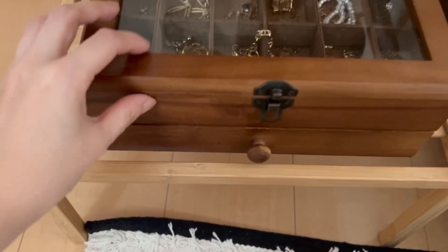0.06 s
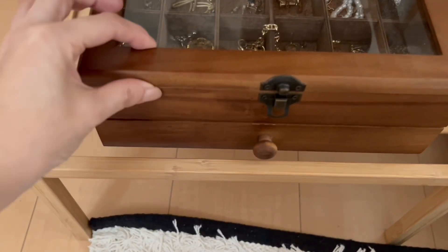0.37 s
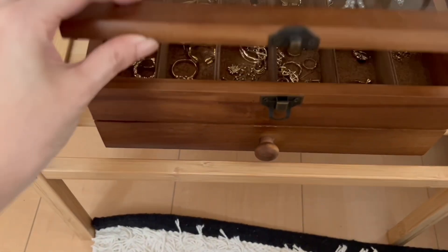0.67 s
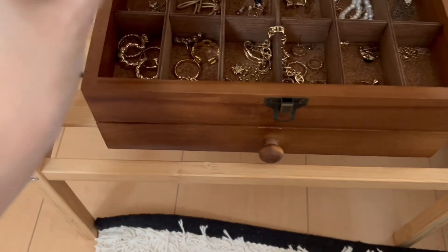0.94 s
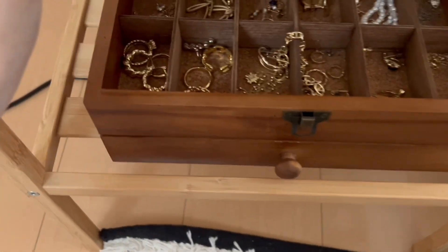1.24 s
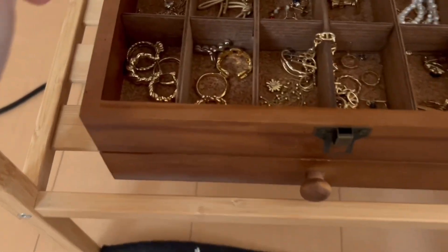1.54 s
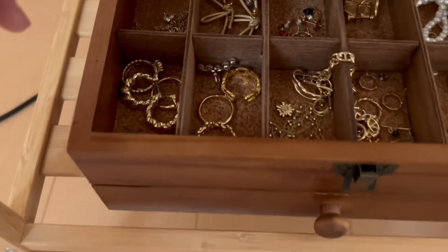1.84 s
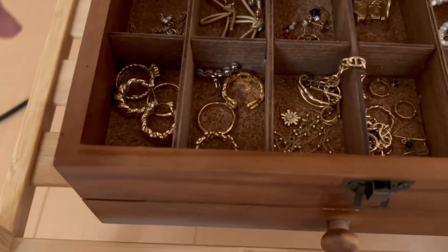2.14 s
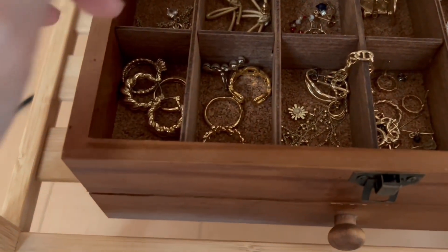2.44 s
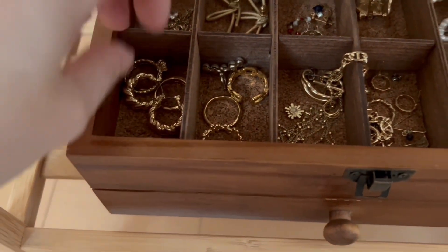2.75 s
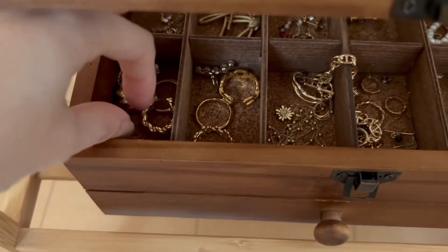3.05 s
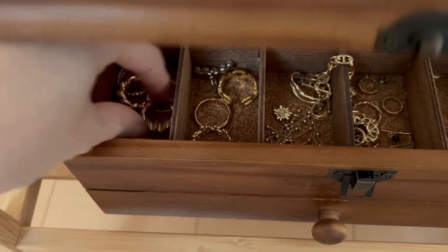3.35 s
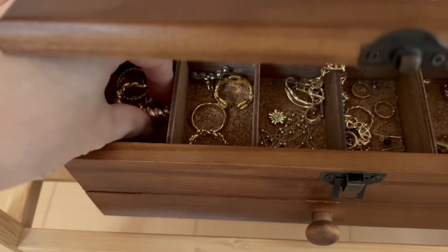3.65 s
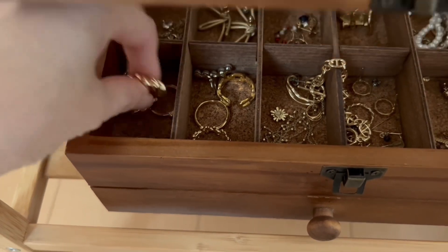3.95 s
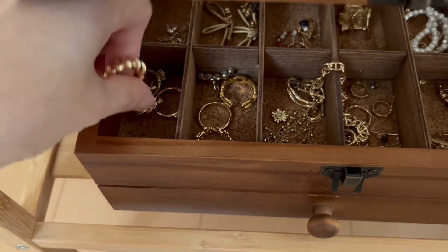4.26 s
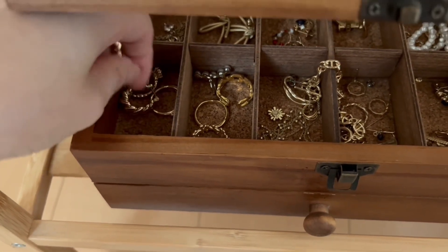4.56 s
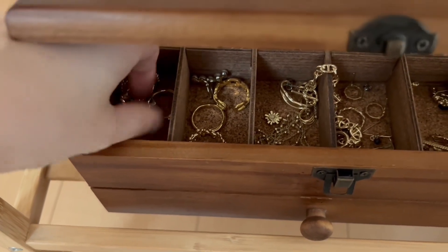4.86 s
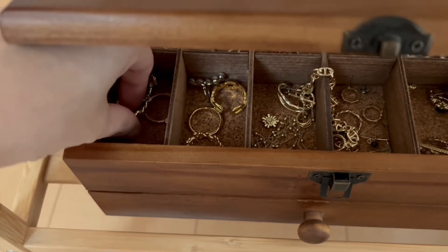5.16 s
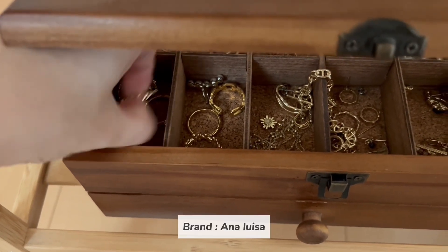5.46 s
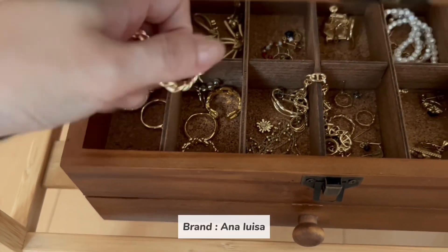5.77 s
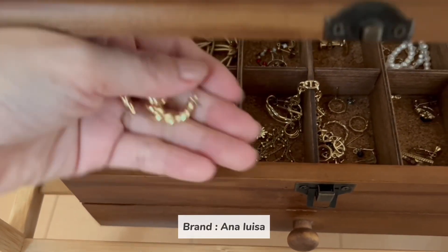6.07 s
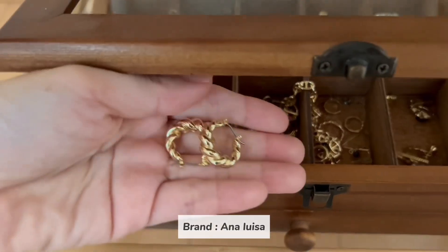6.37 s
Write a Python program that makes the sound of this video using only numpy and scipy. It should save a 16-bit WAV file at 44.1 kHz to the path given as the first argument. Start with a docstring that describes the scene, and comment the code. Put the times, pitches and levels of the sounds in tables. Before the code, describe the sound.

Small metal hoops clack and clink in a wooden jewellery box as fingers lift the lid and pick through, over a low room hum.

```python
"""A low hum and a rustle of clothing, then a hand lifts the lid of a wooden jewellery box: the latch
clicks, the hollow case knocks and the shelf thumps beneath it. Fingers rub the wood and pick out two
gold hoops, which slide and clack on the thin dividers and tray, then ring against each other in the palm.
Struck wood and metal are decaying modes; friction is uneven noise that swells with each move.
A phone's two microphone ports hear it from close by in a small, quiet room."""
import sys
import numpy as np
from scipy import signal
from scipy.fft import rfft, irfft, next_fast_len
from scipy.io import wavfile

SR = 44100
rng = np.random.default_rng(int(sys.argv[2]) if len(sys.argv) > 2 else 0)


def put_to_file(sound):
    """Save the sound as 16-bit audio at rate SR, in the file named by the first command-line argument."""
    columns = np.atleast_2d(sound).T  # one column per channel
    safe = np.clip(columns, -1, 1)
    whole_steps = np.round(safe * 32767)
    wavfile.write(sys.argv[1], SR, whole_steps.astype(np.int16))


N = 282681
TIME = np.arange(N) / SR
RING_TIME = np.arange(SR // 3) / SR  # seconds since a strike

# Tone colours of a gritty scrape, a hoop's hard crack and the bright tick of metal.
# Each row: frequency in Hz, level in dB.
GRIT_SPECTRUM = [(700, 18.5), (1900, 15.5), (2700, 2.5), (3600, 11), (4400, 4.5), (5100, 6.5), (6500, -4),
                 (8000, -5.5), (10500, -13.5), (15500, -9)]
HOOP_CRACK_SPECTRUM = [(1500, -14), (2700, -3.5), (3500, 6.5), (4600, 4), (5800, 11), (8000, -3.5),
                       (10000, -6), (12000, -18)]
TICK_SPECTRUM = [(8000, -20), (10500, -2.5), (13000, -1), (14600, -3), (15600, 0.5), (16000, -21)]
# Modes of the first hoop. Each row: frequency in Hz, level in dB, seconds to fade by 60 dB.
FIRST_HOOP_MODES = [(9565, 10.5, 0.028), (9650, 2, 0.021), (5070, -21, 0.06)]


def undb(db):
    """Decibels to gain."""
    return 10 ** (np.asarray(db) / 20)


def unit(x):
    """Scale to rms 1."""
    return x / np.sqrt(np.mean(x ** 2))


def at_level(x, db):
    """Set the rms level of a strike's first 20 ms."""
    return x * undb(db) / np.sqrt(np.mean(x[:SR // 50] ** 2))


def add(out, s, x):
    """Mix a sound in at s seconds."""
    start = max(int(s * SR), 0)
    out[:, start:start + x.shape[-1]] += x[..., :N - start]


def pan(db):
    """Stereo gains for a left-minus-right level."""
    return undb(np.array([[db], [-db]]) / 2)


def colour(x, spectrum):
    """Equalise through (Hz, dB) points on a log-frequency axis, rolling off below the first."""
    hz, db = np.transpose(spectrum)
    size = next_fast_len(x.shape[-1] + SR // 10)
    f = np.maximum(np.fft.rfftfreq(size, 1 / SR), 1)
    gain = undb(np.interp(np.log(f), np.log(hz), db)) / (1 + (hz[0] / 2 / f) ** 2)
    return irfft(rfft(x, size) * gain, size)[..., :x.shape[-1]]


def wander(rate):
    """A random curve with a spread near 1 that turns `rate` times a second."""
    knots = np.arange(0, TIME[-1] + 1, 1 / rate)
    return np.interp(TIME, knots, rng.standard_normal(len(knots)))


def strokes(moves):
    """Envelope of a series of hand moves: each swells to its fastest moment and dies away."""
    power = 0
    for s, db, rise_s, fall_s in moves:
        away = np.abs(TIME - s) / np.where(TIME < s, rise_s, fall_s)
        bell = np.exp(-np.minimum(away, 10) ** 2.2)
        power = power + (undb(db) * bell) ** 2
    return np.sqrt(power)


def ring(modes, detune, contact_s, sustain=1, pitch=1):
    """Struck modes: the spot that is hit varies strength and pitch, the contact time rounds the attack."""
    hz, db, t60 = np.transpose(modes)[:, :, None]
    strength, shift = rng.standard_normal((2, len(modes), 1))
    phase = 2 * np.pi * hz * pitch * (1 + detune * shift) * RING_TIME
    fade = undb(db + 2 * strength) * np.exp(-np.log(1000) * RING_TIME / (t60 * sustain))
    sign = (-1) ** np.arange(len(modes))[:, None]  # neighbouring modes swing in opposite directions
    attack = 1 - np.exp(-RING_TIME / contact_s)
    return np.sum(sign * fade * np.sin(phase), axis=0) * attack


def chatter(spectrum, rise_s, decay_s):
    """A metal edge skips over a surface in a few milliseconds of tiny impacts."""
    count = len(RING_TIME)
    impact_sizes = undb(3 * np.repeat(rng.standard_normal(count), 32)[:count])
    envelope = (1 - np.exp(-RING_TIME / rise_s)) * np.exp(-RING_TIME / decay_s)
    return colour(rng.standard_normal(count) * impact_sizes * envelope, spectrum)


def scatter(x):
    """Lid and hand scatter the upper mids, so each port hears them with a different phase."""
    centre_hz, width_octaves, spread_radians, step_hz = 3200, 0.54, 1.8, 442
    size = next_fast_len(len(x) + SR // 10)
    f = np.maximum(np.fft.rfftfreq(size, 1 / SR), 1)
    knots = np.linspace(0, 64 * step_hz, 64)
    band = np.exp(-(np.log2(f / centre_hz) / width_octaves) ** 2)
    turn = spread_radians * np.interp(f, knots, rng.standard_normal(len(knots))) * band
    return irfft(rfft(x, size) * np.exp(1j * np.array([turn, -turn]) / 2), size)[:, :len(x)]


def hum():
    """Low ventilation rumble, alike at both ports in the bass, with three wavering tones."""
    # The rumble's colour, then the tones. Each row: frequency in Hz, level in dB.
    rumble_spectrum = [(25, -20.5), (50, -3.5), (75, -1), (130, -6.5), (250, -11), (430, -13.5), (500, -25),
                       (900, -27.5), (1700, -34.5), (2500, -46), (5000, -44), (8000, -70.5), (16000, -54.5)]
    hum_tones = [(73, -64), (101, -64), (296, -70.5)]
    common = colour(rng.standard_normal(N), [(30, 4.5), (400, -2.5), (700, -10.5), (5000, -17.5)])
    apart = colour(rng.standard_normal((2, N)), [(30, -4.0), (400, -3), (700, 2.0), (5000, -3.5)])
    rumble = unit(colour(common + apart, rumble_spectrum)) * undb(-57 + 3.3 * wander(rate=9.8))
    tones = 0
    for hz, db in hum_tones:
        amplitude = np.sqrt(2) * undb(db + 4.1 * wander(rate=6.1))
        tones = tones + amplitude * np.sin(2 * np.pi * hz * TIME + 1.57 * wander(rate=8.9))
    fade_in = undb(-4 * np.maximum(1 - TIME / 0.94, 0))  # comes up 4 dB, then holds
    return (rumble + tones) * fade_in * pan(db=1.6)


def clothing():
    """Fibres swish with each move of the arm and whisper faintly in between."""
    # Each row: peak time in seconds, level in dB, rise and fall in seconds.
    swishes = [(0.03, -86, 0.023, 0.063), (.66, -86, 0.014, .02), (0.838, -75, 0.012, 0.11),
               (1.13, -72.5, 0.083, 0.074), (1.33, -85, 0.087, .15), (1.535, -74.5, 0.032, 0.14),
               (2.345, -72.5, 0.017, 0.17), (2.53, -65, 0.18, 0.15), (2.75, -68.5, 0.042, 0.022),
               (3.11, -79, 0.025, 0.066), (3.35, -67, 0.045, 0.092), (4.395, -75.5, 0.011, 0.012),
               (4.76, -76.5, 0.11, 0.039), (4.93, -74.5, 0.073, 0.046), (5.46, -64.5, 0.025, 0.031),
               (5.6, -85, 0.061, 0.052), (5.87, -69, 0.062, 0.21), (6.31, -79.5, 0.012, 0.0079)]
    # The cloth's airy colour. Each row: frequency in Hz, level in dB.
    cloth_spectrum = [(300, -10.5), (900, -0.5), (2000, -8), (3500, -8), (5500, 2), (8000, 3), (9300, 1.5),
                      (10500, -1), (12500, 2.5), (15500, -5.5)]
    fibres = rng.standard_normal(N) * undb(3.3 * rng.standard_normal(N) + 1.1 * wander(rate=620))
    movement = np.hypot(strokes(swishes), undb(-90.5))
    flutter = undb(1.1 * wander(rate=120))
    return unit(colour(fibres, cloth_spectrum)) * movement * flutter


def gritty_scrapes():
    """Short gritty scrapes: first the hand and lid on the box, later a hoop sliding on wood and skin."""
    # Each row: start in seconds, length in seconds, level in dB.
    scrapes = [(0.349, 0.09, -76), (1.06, 0.11, -71), (3.297, 0.059, -66), (3.362, 0.081, -53),
               (3.45, 0.12, -69.5), (3.91, 0.06, -70), (4.136, 0.13, -70), (4.725, 0.12, -72),
               (4.878, 0.11, -77), (5.116, 0.059, -64), (5.237, 0.069, -70), (5.426, 0.041, -65.5),
               (5.832, 0.098, -70.5)]
    # The hoops rub together as they roll into the palm, and their lowest mode sings.
    # Each row: peak time in seconds, level in dB, rise and fall in seconds.
    rolls = [(5.9, -73, .055, 0.11)]
    pressure = sum(undb(db) * np.sin(np.pi * np.clip((TIME - s) / length, 0, 1))
                   for s, length, db in scrapes)
    grit = rng.standard_normal(N) * undb(1.2 * wander(rate=1500) + 6 * wander(rate=40))
    lowest_mode_hz = FIRST_HOOP_MODES[2][0]
    singing = signal.lfilter(*signal.iirpeak(lowest_mode_hz, Q=35, fs=SR), grit)
    return scatter(unit(colour(grit, GRIT_SPECTRUM)) * pressure + unit(singing) * strokes(rolls))


def finger_rubs():
    """Fingertips catch and slip on the wood with a dull, wide rub."""
    # Each row: peak time in seconds, level in dB, rise and fall in seconds.
    rubs = [(.39, -72, 0.034, 0.081), (1.13, -60.5, 0.13, 0.11), (1.55, -68.5, 0.3, 0.2),
            (2.39, -68, 0.11, 0.1), (2.62, -66, 0.17, 0.042), (2.81, -56.5, 0.057, 0.07),
            (3.41, -51.5, 0.093, 0.15), (3.94, -49.5, 0.036, 0.075), (4.17, -64.5, 0.014, 0.034),
            (4.74, -56, 0.084, 0.041), (4.96, -49.5, 0.066, 0.057), (5.21, -62.5, 0.047, 0.13),
            (5.45, -61, 0.015, 0.053)]
    # The rub's dark colour. Each row: frequency in Hz, level in dB.
    rub_spectrum = [(200, 8), (450, 14.5), (800, 10.5), (1200, 4), (2000, -6), (3000, -6.5), (5000, -14.5),
                    (9000, -56.5)]
    friction = rng.standard_normal(N) + 2.0 * rng.standard_normal((2, N))
    slips = friction * undb(7.2 * wander(rate=240))
    return unit(colour(slips, rub_spectrum)) * strokes(rubs)


def rattle(strike):
    """Loose metal bounces on in quick, uneven, fading touches that share about the strike's energy."""
    bounces_per_s, rise_s, decay_s = 350, 0.0044, 0.018
    bounces = rng.random(len(RING_TIME)) < bounces_per_s / SR
    envelope = (1 - np.exp(-RING_TIME / rise_s)) * np.exp(-RING_TIME / decay_s)
    touches = bounces * rng.standard_normal(len(RING_TIME)) * envelope
    return signal.fftconvolve(touches / np.linalg.norm(touches), strike)[:len(RING_TIME)]


def metal_on_wood(contacts, crack_spectrum, tick_db):
    """Metal cracks on wood: the struck spot and dividers ring, the tray follows, the metal rattles on."""
    # Modes of the heavy tray and thin dividers.
    # Each row: frequency in Hz, level in dB, seconds to fade by 60 dB.
    tray_modes = [(178.7, -19.5, 0.081), (257, -18, 0.095), (438, -1.5, 0.037), (515, -4, 0.018),
                  (625.5, 1, 0.044), (713, -1, 0.017)]
    divider_modes = [(980, 1, 0.02), (1203, 8, 0.028), (1585, -2.5, 0.044), (1828, 6, 0.017),
                     (2165, 2.5, 0.0083), (2365, -4, 0.025), (2580, 1.5, 0.01), (3030, -7, 0.0096),
                     (3450, -1, 0.012)]
    # Close modes of a struck spot. Each row: multiple of its note, level in dB, seconds to fade by 60 dB.
    spot_cluster = [(1, 2.5, 0.014), (0.88, -1, 0.013), (1.12, -3, 0.011)]
    # A dry thwack across the grain and one scraping touch. Each row: frequency in Hz, level in dB.
    thwack_spectrum = [(300, -8), (500, -2), (700, 2), (900, -3.5), (1200, 2), (1500, 5.5), (2100, 0.5),
                       (2900, -10), (5000, -21), (9000, -36)]
    scrape_spectrum = [(600, 2), (1200, 12), (2300, 0.5), (2900, -1), (3600, -2.5), (4300, -13.5),
                       (5400, -9), (6500, -22.5), (12000, -27.5)]
    # Where the hand works. Each row: time in seconds, left minus right in dB.
    hand_path = [(1.1, 3.5), (2.57, 0), (3.38, -4), (3.95, -2.5), (4.7, 11), (4.95, 1.5), (5.12, -0.5),
                 (5.4, -1)]
    out = np.zeros((2, N))
    for s, db, crack_db, tray_db, spot_hz, spot_db, rattle_db in contacts:
        place = pan(np.interp(s, *np.transpose(hand_path)))
        spot_modes = [(spot_hz * ratio, mode_db, t60) for ratio, mode_db, t60 in spot_cluster]
        graze = at_level(chatter(GRIT_SPECTRUM, rise_s=0.0014, decay_s=0.0025), db - 15)
        tray = at_level(ring(tray_modes, detune=0.033, contact_s=0.0018, sustain=0.94), db + tray_db)
        dividers = at_level(ring(divider_modes, detune=0.026, contact_s=0.0016), db - 2)
        thwack = at_level(chatter(thwack_spectrum, rise_s=0.0026, decay_s=0.0059), db - 8.5)
        spot = at_level(ring(spot_modes, detune=0.011, contact_s=0.0004), db + spot_db)
        crack = at_level(chatter(crack_spectrum, rise_s=0.0022, decay_s=0.0034), db + crack_db)
        tick = at_level(chatter(TICK_SPECTRUM, rise_s=0.003, decay_s=0.0019), db + crack_db + tick_db)
        scrape = at_level(chatter(scrape_spectrum, rise_s=0.00047, decay_s=0.0012), db - 6.5)
        add(out, s - 0.004, scatter(graze) * place)  # metal never lands flat: one edge touches first
        add(out, s + 0.00099, tray * place)
        bounces = undb(rattle_db) * rattle(spot + scrape)
        add(out, s, scatter(dividers + thwack + spot + bounces) * place + scatter(crack + tick))
    return out


def lid_clicks():
    """Latch and hinge click against the wood as the lid moves."""
    # Each row: start in seconds, level in dB, crack and tray in relative dB,
    # the struck spot's note in Hz, spot and rattle in relative dB.
    clicks = [(0.471, -64.5, 5.5, -5, 2020, -9, 9.5), (0.478, -59, 1, -10, 1920, -19, 0.5),
              (1.084, -72, 14, -10, 1820, 3, -4), (1.093, -55.5, 11.5, 2, 1580, 2.5, -4.5),
              (1.097, -59, 4, 3, 1750, -14, 5), (2.565, -63.5, 0, 16, 1700, -2.5, -4),
              (2.779, -56, 7.5, 11, 900, 1.5, -2), (2.848, -61.5, -8, 7, 1920, 3.5, -14)]
    # The crack of the lid's fittings. Each row: frequency in Hz, level in dB.
    fitting_spectrum = [(1500, -29), (2800, 9), (3300, 1), (4000, -4.5), (5400, 7), (6500, 3.5), (8500, 0),
                        (10000, -8.5), (12000, -28)]
    return metal_on_wood(clicks, fitting_spectrum, tick_db=-13)


def case_knocks():
    """Lid and hand knock the hollow case; the shelf under it answers with a slow, low thump."""
    # Each row: start in seconds, level in dB, contact time in seconds, share of full ring, pitch factor.
    knocks = [(0.481, -40, 0.0012, 0.55, 1.03), (1.111, -41.5, 0.0043, 0.3, 0.95),
              (2.567, -36, 0.00043, 1, 0.98), (2.784, -44.5, 0.00087, 1, 0.94),
              (3.043, -56, 0.0016, 0.59, 1.02), (3.395, -40, 0.00064, 0.5, 1.01),
              (4.493, -52, .002, 0.81, 1.03), (4.578, -56, 0.0016, 1, 1), (4.682, -43, .001, 0.56, 0.9),
              (4.695, -37, 0.00061, 1, 1.01), (4.903, -43.5, .0007, .8, 1.01)]
    # Soft bumps of the hand that shake only the shelf. Each row: start in seconds, level in dB.
    bumps = [(2.809, -44.5), (3.316, -49.5), (5.515, -47.5)]
    # Modes of case and shelf. Each row: frequency in Hz, level in dB, seconds to fade by 60 dB.
    case_modes = [(334.5, 1, 0.079), (407.6, 2.5, 0.095), (447, -14.5, 0.13), (630, -7.5, 0.076),
                  (725, -17, 0.052), (937, -11, 0.076), (1550, -19.5, 0.046)]
    shelf_modes = [(78.5, -4, 0.34), (115.8, -1, 0.14), (172.6, 3, 0.065)]
    firm_knock_db, firm_thump_db, thump_db_per_db, thump_delay_s = -40.5, -49.5, 0.59, 0.0236
    out = np.zeros((2, N))
    for s, db, contact_s, sustain, pitch in knocks:
        knock = ring(case_modes, detune=0.014, contact_s=contact_s, sustain=sustain, pitch=pitch)
        add(out, s, at_level(knock, db))
    thumps = [(s + thump_delay_s, firm_thump_db + thump_db_per_db * (db - firm_knock_db))
              for s, db, *_ in knocks]
    for s, db in thumps + bumps:
        add(out, s, at_level(ring(shelf_modes, detune=0.066, contact_s=0.031), db))
    return out * pan(db=1.5)


def skin_rasps():
    """Dry skin and sleeve catch suddenly and drag on in fine, uneven grains."""
    # Each row: peak time in seconds, level in dB, rise and fall in seconds.
    rasps = [(0.832, -74, 0.0071, 0.18), (1.11, -65, 0.074, 0.088), (1.53, -74.5, 0.013, 0.29),
             (2.36, -89, 0.04, 0.18), (2.58, -71, 0.13, 0.083), (2.8, -74, 0.034, 0.057),
             (3.525, -70, 0.012, 0.023), (4.165, -76, 0.0085, 0.036), (4.235, -79.5, 0.01, 0.023),
             (4.71, -73.5, 0.036, 0.087), (4.945, -72, 0.0065, 0.012), (5.145, -60, 0.011, 0.021),
             (5.26, -81, 0.02, 0.052), (5.94, -62, 0.035, 0.04)]
    # The rasp's dry colour. Each row: frequency in Hz, level in dB.
    rasp_spectrum = [(800, -3.5), (2000, -7), (2800, -6), (3600, 1.5), (4300, -5.5), (5300, 6),
                     (6200, -4.5), (12000, -11)]
    grains = rng.standard_normal(N) * undb(1.6 * wander(rate=2000) + 3.1 * wander(rate=57))
    return scatter(unit(colour(grains, rasp_spectrum)) * strokes(rasps))


def box_creaks():
    """Hinge and dry joints stick and slip under the hand, sounding a few narrow resonances."""
    # Each row: start in seconds, length in seconds, pitch in Hz, level in dB.
    creaks = [(1.021, 0.18, 1644, -61), (2.326, 0.15, 896, -63)]
    # Each row: multiple of the creak's pitch, level in dB.
    resonances = [(0.68, -3), (1, -3), (2.1, -14)]
    out = np.zeros((2, N))
    for s, length, hz, db in creaks:
        slips = rng.standard_normal(N) * undb(3.3 * wander(rate=126))
        tone = sum(undb(part_db) * signal.lfilter(*signal.iirpeak(hz * ratio, Q=20, fs=SR), slips[:SR])
                   for ratio, part_db in resonances)
        swell = np.sin(np.pi * np.clip(TIME[:SR] / length, 0, 1))
        add(out, s, unit(tone) * undb(db) * swell)
    return out


def finger_drags():
    """A fingertip sticks and slips over the grain of the case, each catch a tiny click."""
    # Each row: peak time in seconds, level in dB, rise and fall in seconds.
    drags = [(2.4, -72, 0.049, 0.11), (2.6, -65.5, 0.091, 0.058), (2.76, -64, 0.018, 0.038),
             (5.46, -66, .025, 0.037)]
    # The colour of one catch. Each row: frequency in Hz, level in dB.
    catch_spectrum = [(500, 12.5), (900, 6), (1400, -2), (2000, 1), (2500, -8), (3500, -12), (4700, -7),
                      (5400, -5), (7000, -14), (12000, -21)]
    catches_per_s = 650
    caught = rng.random(N) < catches_per_s / SR
    sizes = undb(2.5 * rng.standard_normal(N) + 4.8 * wander(rate=46))
    catches = caught * sizes * rng.choice([-1, 1], N)
    return scatter(unit(colour(catches, catch_spectrum)) * strokes(drags))


def hoop_clacks():
    """The gold hoops strike their compartment, with a brighter tick than the lid's fittings."""
    # Each row: start in seconds, level in dB, crack and tray in relative dB,
    # the struck spot's note in Hz, spot and rattle in relative dB.
    clacks = [(2.961, -73.5, -25, 11.5, 1430, -3, -3), (3.373, -38.5, -5.5, 1.5, 2290, -8, -6),
              (3.385, -48, -10, 7.5, 2400, -2.5, -5), (3.3975, -50, -12, 7, 1140, -16, -19),
              (3.408, -47, -7.5, -7, 2120, -1, -16), (3.459, -47.5, -5.5, 0.5, 2140, -5.5, -5),
              (3.514, -51.5, -5, -2.5, 2218, -3, -14), (3.716, -52, -10, -4, 2260, -11.5, 3),
              (3.749, -59.5, -15, 6.5, 2280, 0, -13), (3.91, -35, -10, 5, 2470, -0.5, -16.5),
              (3.925, -53, -17, 9, 1900, -6, -6), (3.946, -56, -24, 3, 2070, -1, -8),
              (3.959, -47.5, -10.5, 1.5, 2330, -3.5, -8.5), (4.421, -79, -15.5, -3, 1780, -2, -16),
              (4.692, -64, -2, 17.5, 1850, -3, -2), (4.924, -46, -29, 5.5, 960, -4, -15),
              (4.9445, -44, -41, 3, 1767, -0.5, -10.5), (4.954, -58, -28, 7, 1040, 9.5, -11),
              (4.977, -61, -9.5, 4, 2220, -2, -4), (5.101, -69, -31, 4, 2220, 2, -15),
              (5.13, -63.5, -3, 7.5, 1240, -1, 10), (5.139, -54, -10, -1, 3530, -8.5, -1),
              (5.164, -56.5, -10, -4, 2280, -6, -17), (5.207, -50, -5.5, 7.5, 1650, -12, -8),
              (5.232, -48, -8, 2, 1570, -20, -13), (5.317, -50.5, -6, -0.5, 1960, 0, -9),
              (5.381, -49, -12.5, -1, 2100, -7.5, -19)]
    return metal_on_wood(clacks, HOOP_CRACK_SPECTRUM, tick_db=-8.5)


def hoop_clinks():
    """Two hoops meet with a sharp tick and ring for as long as the fingers that hold them allow."""
    # Each row: start in seconds, levels of first hoop, second hoop and tick in dB, share of full ring.
    clinks = [(3.459, -61, -82, -58, 0.68), (3.729, -72.5, -82, -65, 0.34), (5.875, -46, -63.5, -59, 1),
              (5.8835, -51, -67, -63, 1), (5.9306, -53, -57.5, -57.5, 0.66),
              (5.944, -61.5, -47.5, -54, 0.53), (5.951, -63, -54, -60.5, .55), (5.963, -67, -62, -66.5, .9),
              (6.046, -94, -64.5, -73, 0.35), (6.0632, -66, -58.5, -65, 0.41),
              (6.143, -71.5, -64, -68, 0.81)]
    # Modes of the second hoop and of the glassy top note that rings with the first.
    # Each row: frequency in Hz, level in dB, seconds to fade by 60 dB.
    second_hoop_modes = [(6730, 4, 0.026), (7260, 0, 0.062), (7650, -7, 0.028), (7850, -1, 0.035),
                         (8350, -6, 0.018), (8940, -2.5, 0.023)]
    top_modes = [(12690, 14, 0.06), (12550, 0, 0.04), (12835, -1, .04), (15600, -10, 0.02)]
    out = np.zeros((2, N))
    for s, first_db, second_db, tick_db, sustain in clinks:
        first = ring(FIRST_HOOP_MODES, detune=0.003, contact_s=0.0002, sustain=sustain)
        second = ring(second_hoop_modes, detune=0.0044, contact_s=0.00029, sustain=sustain)
        top = ring(top_modes, detune=0, contact_s=0.00064, sustain=sustain)
        ringing = at_level(first, first_db) + at_level(second, second_db) + at_level(top, first_db + 5.5)
        crack = at_level(chatter(HOOP_CRACK_SPECTRUM, rise_s=0.00038, decay_s=0.0047), second_db - 8)
        tick = at_level(chatter(TICK_SPECTRUM, rise_s=0.0002, decay_s=0.00074), tick_db)
        add(out, s, scatter(ringing + crack + tick))
    return out


def room(x, tail_db, early_db):
    """Add quick reflections from lid, shelf and floor, and a short tail, wide in the bass."""
    crossover_hz, bass_t60_s, treble_t60_s = 1500, 0.23, 0.29
    t = np.arange(SR * 2 // 3) / SR
    lowpass = signal.butter(2, crossover_hz, fs=SR, output="sos")
    highpass = signal.butter(2, crossover_hz, "high", fs=SR, output="sos")
    common = rng.standard_normal(len(t))
    bass = signal.sosfilt(lowpass, 0.81 * (common + rng.standard_normal((2, len(t)))))
    treble = signal.sosfilt(highpass, 0.73 * common + 0.06 * rng.standard_normal((2, len(t))))
    tail = 1.4 * bass * np.exp(-np.log(1000) * t / bass_t60_s)
    tail += treble * np.exp(-np.log(1000) * t / treble_t60_s)
    early = rng.standard_normal(len(t)) + 0.34 * rng.standard_normal((2, len(t)))
    early *= np.exp(-t / 0.015) * (t > 0.002)
    response = (undb(tail_db) * unit(tail * (t > 0.009)) + undb(early_db) * unit(early)) / np.sqrt(len(t))
    return x + signal.fftconvolve(x, response, axes=1)[:, :N]


def scene():
    """Strikes and finger drags sound in the room; the other friction sounds and the hum stay dry."""
    contacts = lid_clicks() + hoop_clacks() + finger_drags()
    wood = room(case_knocks(), tail_db=-16, early_db=-19) + room(contacts, tail_db=-16.5, early_db=-11.5)
    gold = room(hoop_clinks(), tail_db=-22, early_db=-21)
    friction = gritty_scrapes() + clothing() + finger_rubs() + skin_rasps() + box_creaks()
    return wood + gold + friction + hum()


def record(dry):
    """The phone's left port hears the box slightly before the right; the very top is cut."""
    # The phone's stereo processing shifts the phase between left and right.
    # Each row: frequency in Hz, extra lead of the left channel in radians.
    stereo_phase = [(0, 0), (300, -.78), (620, -2.09), (1200, -2.3), (1800, -2.77), (2400, -2.43),
                    (3700, -.28), (4400, 1.3), (5900, 1)]
    port_lag_s, top_hz = 0.000227, 16200
    size = next_fast_len(N + SR // 10)
    f = np.fft.rfftfreq(size, 1 / SR)
    lead = 2 * np.pi * f * port_lag_s + np.interp(f, *np.transpose(stereo_phase))
    ports = irfft(rfft(dry, size) * np.exp(1j * np.array([lead, -lead]) / 2), size)[:, :N]
    return signal.sosfilt(signal.ellip(8, 0.2, 70, top_hz, fs=SR, output="sos"), ports)


dry = scene()
out = record(dry)
put_to_file(out)
```